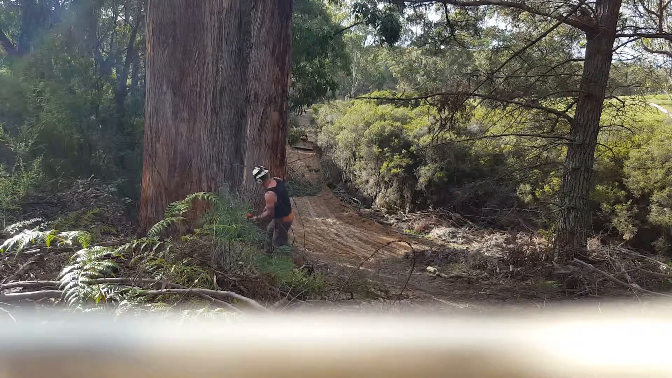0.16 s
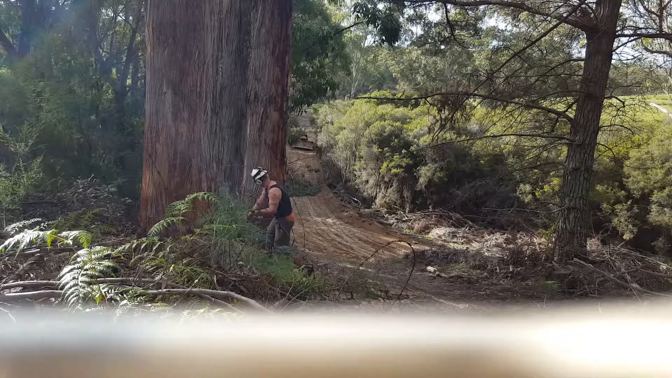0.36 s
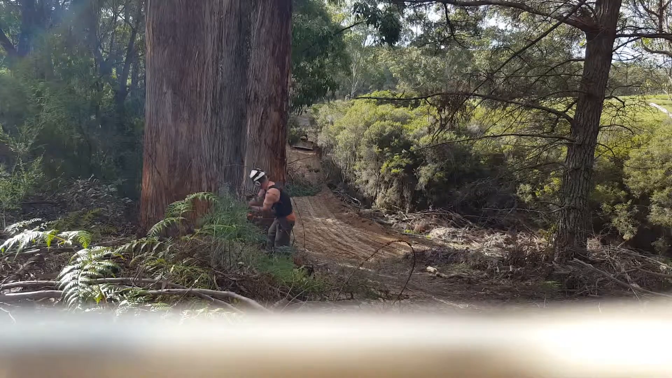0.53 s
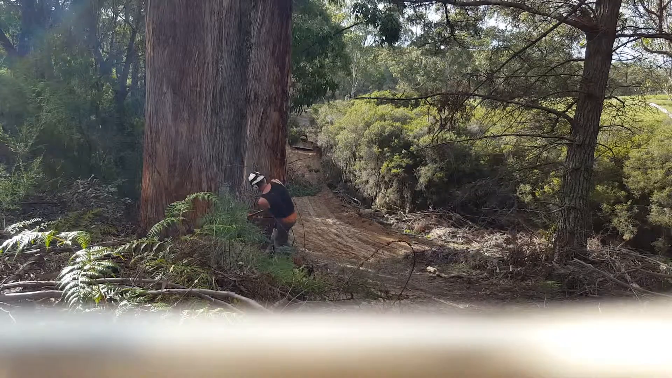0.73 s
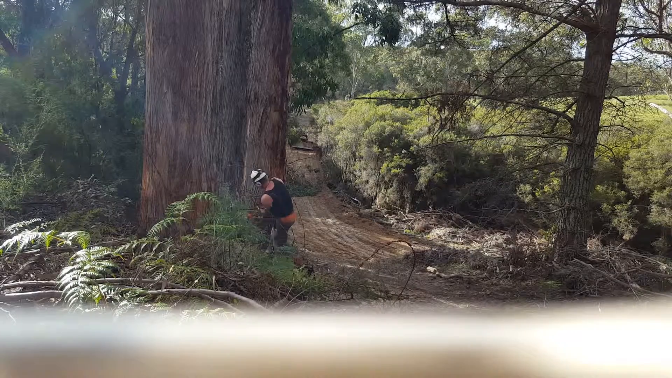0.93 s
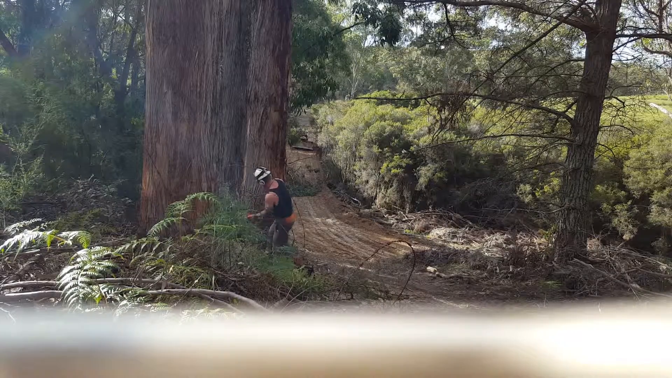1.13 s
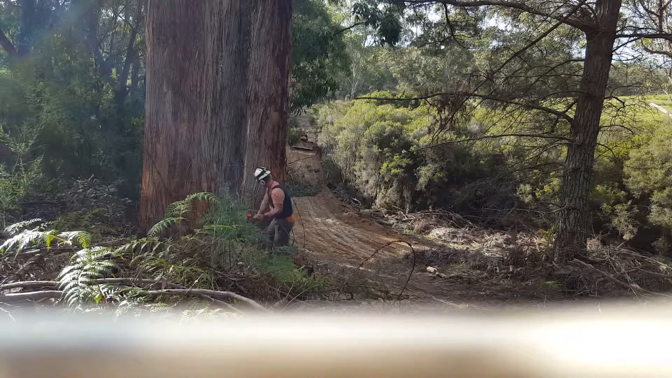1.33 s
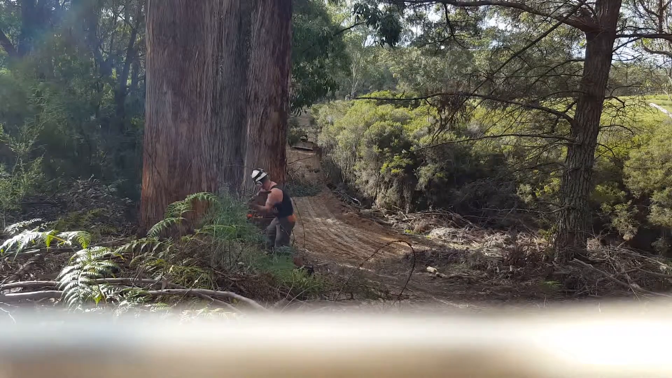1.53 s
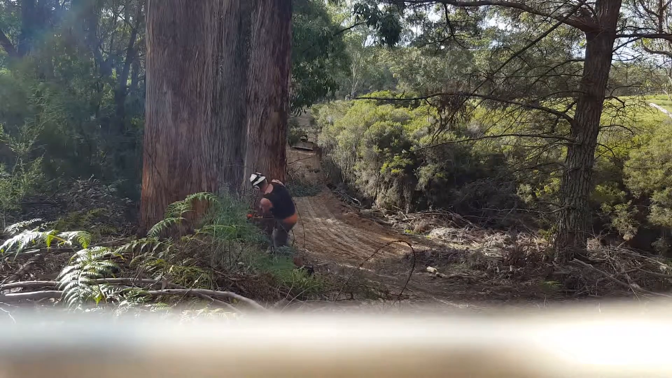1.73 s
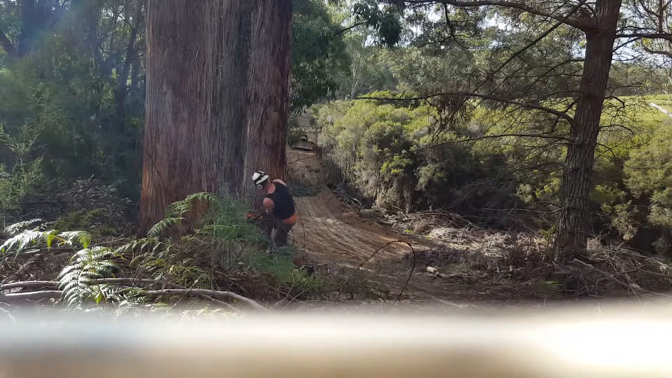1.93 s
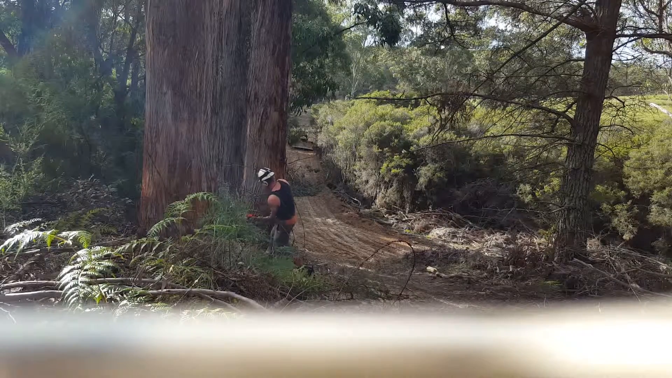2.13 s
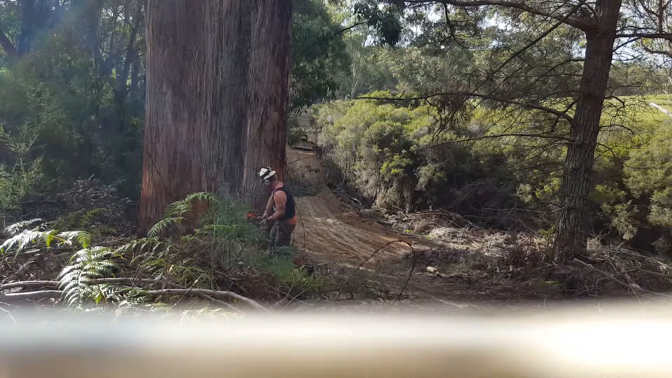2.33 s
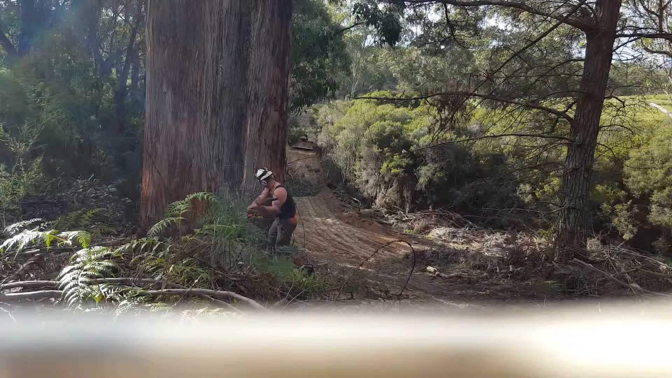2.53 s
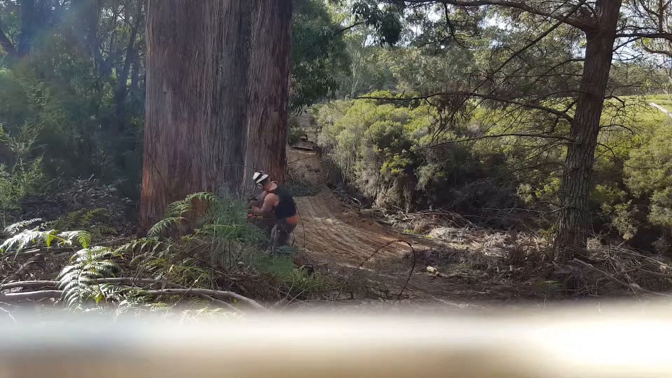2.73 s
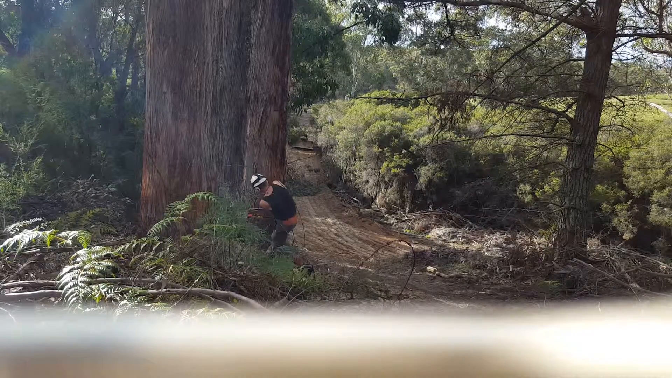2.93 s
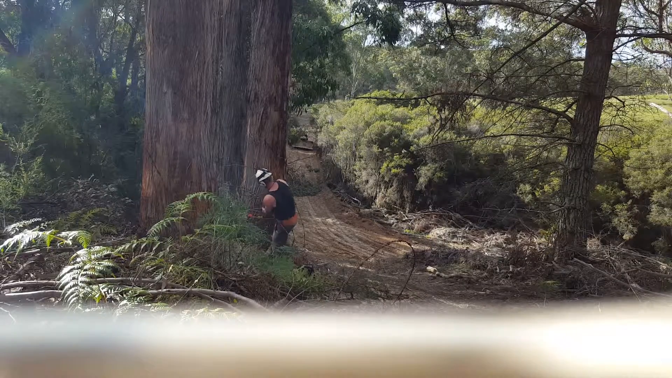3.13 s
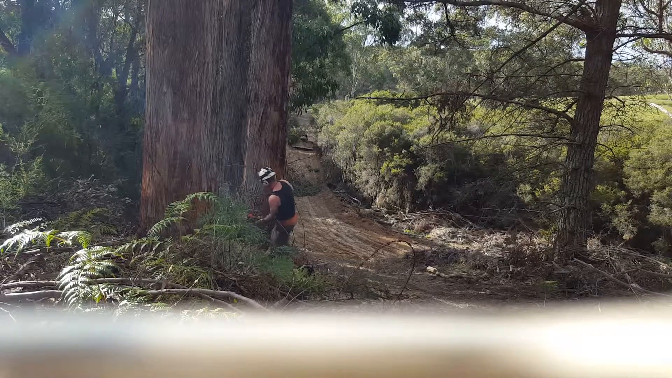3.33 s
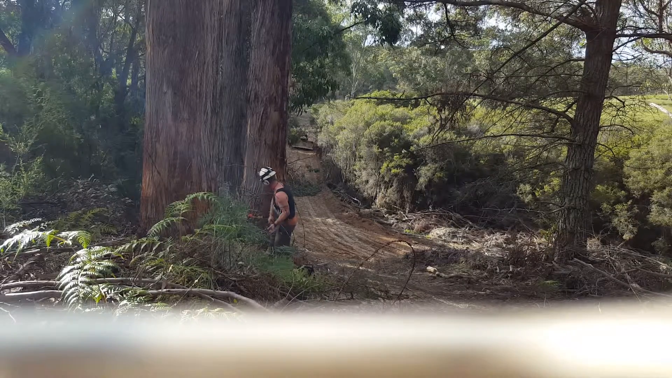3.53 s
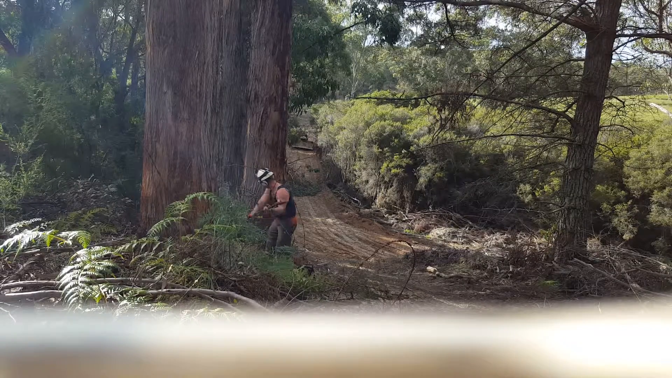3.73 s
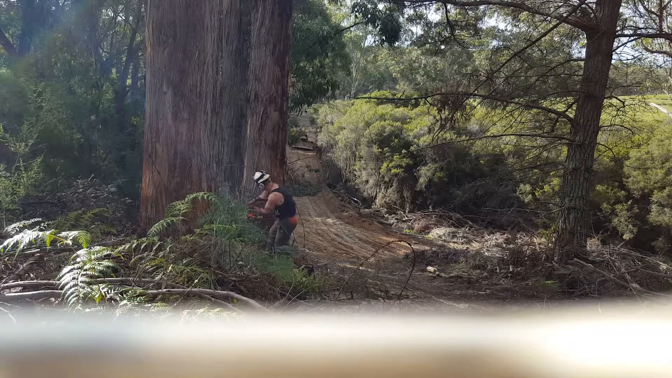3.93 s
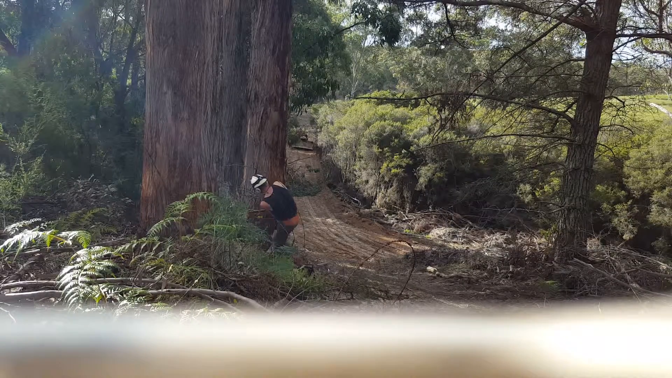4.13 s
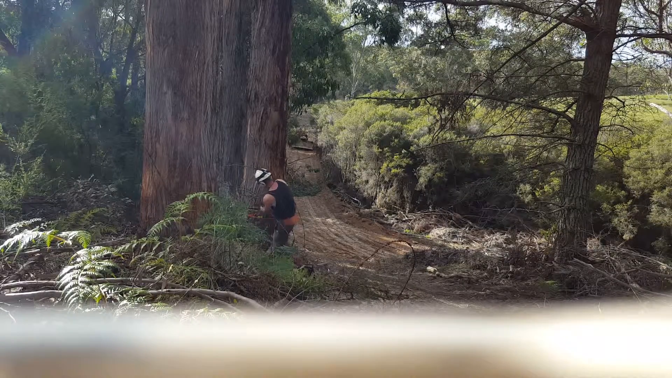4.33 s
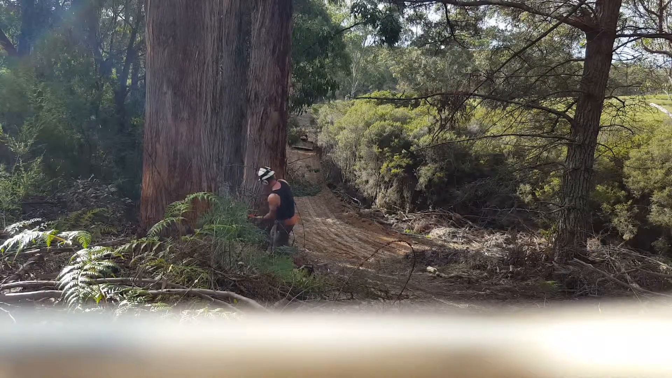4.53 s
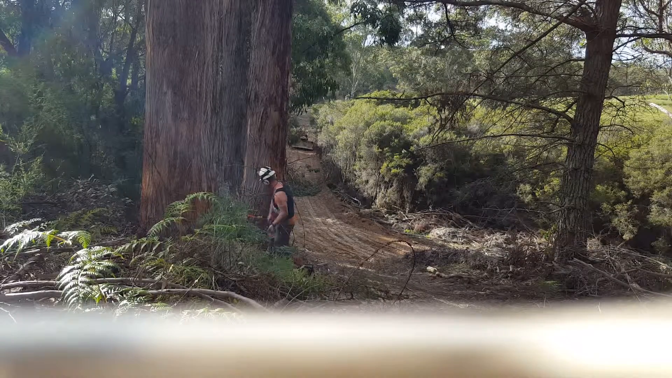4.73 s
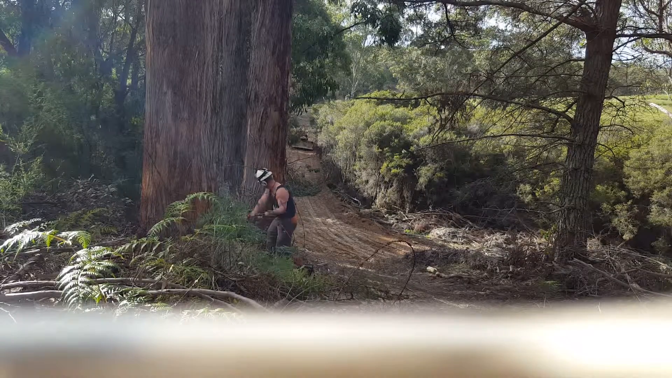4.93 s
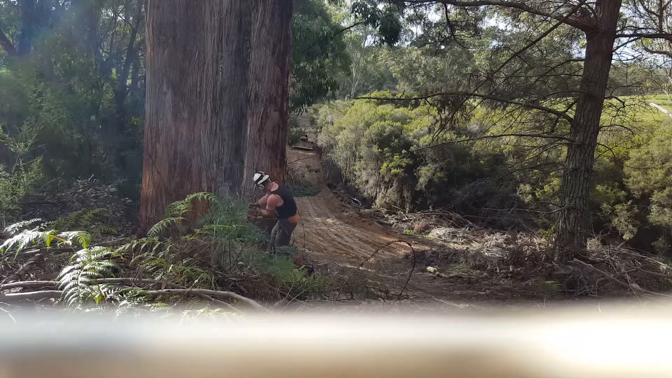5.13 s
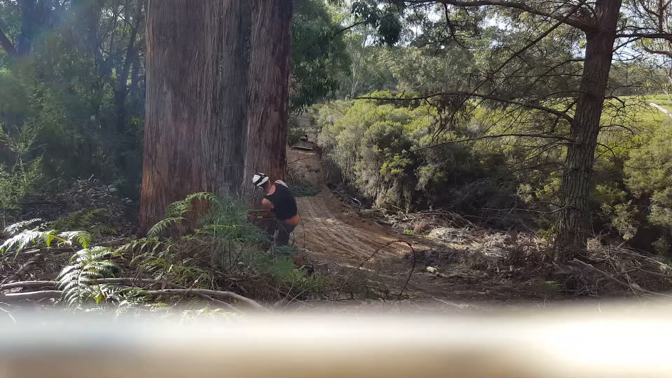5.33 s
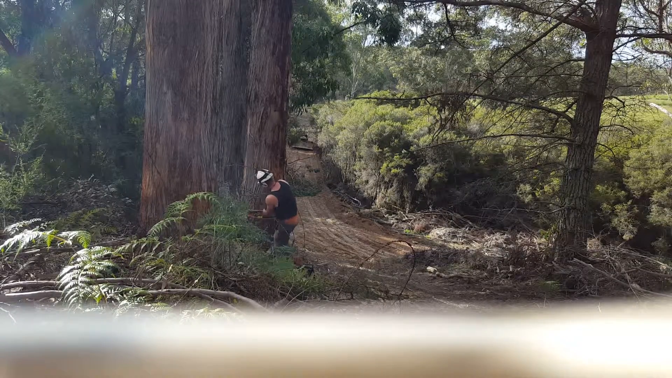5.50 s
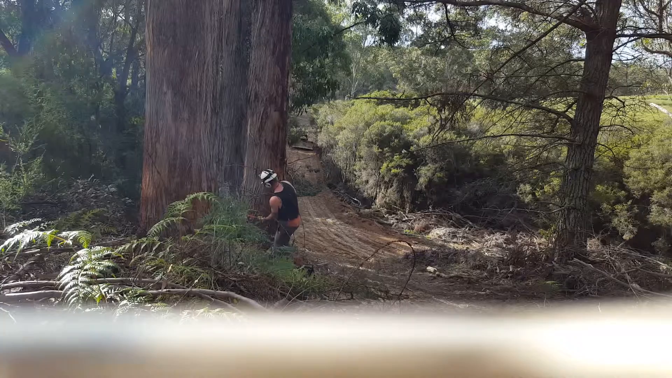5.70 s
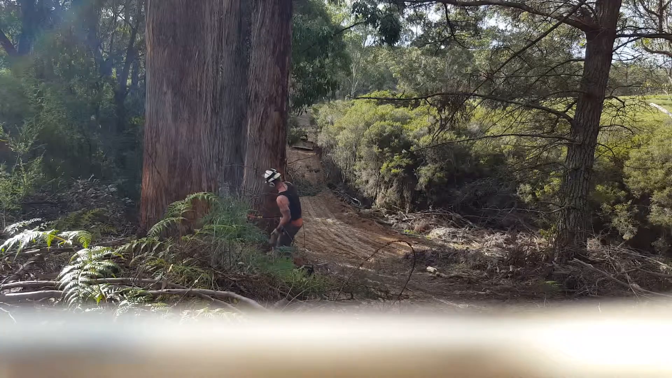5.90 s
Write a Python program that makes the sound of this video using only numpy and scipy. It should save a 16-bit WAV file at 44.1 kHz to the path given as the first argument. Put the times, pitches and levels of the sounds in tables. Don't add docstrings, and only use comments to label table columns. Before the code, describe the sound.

The tail of an earlier hammer blow fades beneath a droning engine and fan. Five blows follow, a little over a second apart, cracking on steel and thumping in wood, with patchy echoes off trunks and leaves. The third, weak one leaves the wedge rattling; the last two are loudest and make the background sag briefly. Small rustles, ticks and very faint chirps fill the gaps. Stereo microphone, open woodland.

```python
import sys
import numpy as np
from scipy import signal
from scipy.fft import rfft, irfft, next_fast_len
from scipy.io import wavfile
from scipy.ndimage import uniform_filter1d

SR = 44100
rng = np.random.default_rng(int(sys.argv[2]) if len(sys.argv) > 2 else 0)


def master(y):
    cut = np.clip(np.atleast_2d(y).T, -1, 1)
    pcm = np.round(cut * 32767)
    wavfile.write(sys.argv[1], SR, pcm.astype(np.int16))


def decibels_to_gain(level_db):
    exponent = np.asarray(level_db, float) / 20
    return 10 ** exponent


N = 267246
T = np.arange(N) / SR
SIDES = np.array([[1], [-1]])


def set_rms(x, db):
    return x * decibels_to_gain(db) / np.sqrt(np.mean(x ** 2))


def wander(rate_hz, size=N):
    hold = int(SR / rate_hz)
    steps = np.repeat(rng.standard_normal(size // hold + 1), hold)
    return 1.3 * uniform_filter1d(uniform_filter1d(steps, hold), hold)[:size]


def ring(x, hz, t60):
    pole = np.exp(2j * np.pi * hz / SR - np.log(1000) / (t60 * SR))
    return signal.lfilter([1], [1, -pole], x).imag


def read(table, hz, column=1):
    table = np.array(table)
    return np.interp(np.log(hz), np.log(table[:, 0]), table[:, column])


def bands(lo_hz, alike, size):
    octave = np.log2(np.arange(size // 2 + 1) * SR / size + 1e-9)
    white = rfft(rng.standard_normal((2, size)))
    for centre in lo_hz * 2 ** np.arange(0, np.log2(18000 / lo_hz), 1 / 3):
        a, b = np.searchsorted(octave, np.log2(centre) + np.array([-1, 1]) / 3)
        shape = np.cos(np.pi / 2 * 3 * (octave[a:b] - np.log2(centre))) ** 2
        mid, side = irfft(np.pad(white[:, a:b] * shape, ((0, 0), (a, 0))), size)
        share = np.clip(read(alike, centre), -.99, .99)
        yield centre, np.sqrt(1 + share) * mid + np.sqrt(1 - share) * side * SIDES


def add(out, s, sound):
    i = int(s * SR)
    out[:, max(i, 0):max(i + sound.shape[1], 0)] += sound[:, max(-i, 0):N - i]


# start in seconds, kind of contact, crack in dB, treble snap in dB, thump in dB.
BLOWS = [
    (-.14, "ringing", -23.5, -36, -44),
    (0.8423, "glancing", -7, -29, -19.5),
    (1.8784, "loose", 0, -7, -16.5),
    (2.9813, "seated", -5.5, -18, -14),
    (4.2180, "seated", 2.5, -15, -13),
    (5.3914, "seated", 3, -21.5, -16),
]
SCATTER = {"ringing": (-42, -38.5, 3.7), "glancing": (-45.5, -65, -2.4), "loose": (-32.5, -40.5, 1.5),
           "seated": (-31, -35, 1)}
CONTACT = {"ringing": (.018, .0015, -3.5), "glancing": (.0015, .003, 7.5), "loose": (.0098, .0026, -10.5),
           "seated": (.013, .00133, -7)}


def hammer():
    out = np.zeros((2, N))
    for s, kind, crack_db, snap_db, thump_db in BLOWS:
        bush_db, stems_db, bright_db = SCATTER[kind]
        rise_s, second_s, second_db = CONTACT[kind]
        glancing = kind == "glancing"
        grit_hz = np.linspace(4800, 14400, num=28) + rng.uniform(-150, 150, size=28)
        grit = [(hz, 420, 3.2 * rng.standard_normal() - 5.5 * np.log2(hz / 8000)) for hz in grit_hz]
        steel = decibels_to_gain(crack_db) * crack(wedge(kind, crack_db), second_s, second_db)
        sound = steel + decibels_to_gain(snap_db) * crack(grit, second_s, second_db)
        add(out, s, sound)
        add(out, s, decibels_to_gain(thump_db) * thump(glancing, rise_s, damping=.7 if glancing else 1.0))
        push = crack([(140, 42, 0), (278, 41, -7)], 0.00064, 0)
        push_db = thump_db + 12.5 - 2500 * rise_s
        add(out, s + .002, -decibels_to_gain(push_db) * push)
        dull_db = .1 * crack_db if kind == "seated" else 0
        add(out, s, decibels_to_gain(bush_db) * bush(bright_db - dull_db))
        add(out, s, decibels_to_gain(stems_db) * stems(sound))
    return out


WEDGE = {"ringing": [(1000, 420, 3), (3280, 130, -4), (5120, 80, -1.5), (6000, 87, -10), (7800, 150, -11)],
         "glancing": [(872, 98, 0.5), (1185, 116, 0.5), (1690, 76, -19), (2230, 150, -2), (2470, 240, -7.5),
         (4000, 420, -17)], "loose": [(1080, 230, -1.5), (1399, 140, 0.5), (1690, 96, -4), (2160, 150, -6),
         (2920, 120, -3.5), (3230, 150, -1), (4050, 180, -4)], "seated": [(573.5, 52, -12.5),
         (1198, 92, -2.5), (1590, 150, -14), (2180, 220, -13.5), (2674, 260, -9), (2985, 190, -21),
         (3600, 220, -24), (4200, 320, -15), (4750, 350, -18.5)]}


def wedge(kind, crack_db):
    force = crack_db if kind == "seated" else 0
    main_lo_hz, main_hi_hz = 1000, 1400
    modes = []
    for hz, width, db in WEDGE[kind]:
        if main_lo_hz < hz < main_hi_hz:
            width = width * decibels_to_gain(-0.76 * force)
        if hz < main_lo_hz:
            db = db - force
        modes.append((hz * (1 + .0023 * force), width, db))
    return modes


# frequency in Hz, left minus right in dB.
PORTS = [(500, -0.5), (1200, -3.5), (2400, 0), (4400, 1.5), (8000, 8.5), (13000, 3.5)]


def crack(modes, second_s, second_db):
    left_lead_s, attack_s = .000065, 0.00061
    late, out = T[:2048] - np.array([[0], [left_lead_s]]), 0
    for s, hit_db in ((0, 0), (second_s, second_db)):
        u = np.maximum(late - s, 0)
        for hz, width, db in modes:
            decay = (1 - np.exp(-u / attack_s)) * np.exp(-np.pi * 1.1 * width * u)
            mode = -np.sin(2 * np.pi * hz * u) * decay
            gain = decibels_to_gain(db + hit_db + read(PORTS, hz) / 2 * SIDES)
            out = out + mode * gain * width
    return out / np.abs(out).max()


# frequency in Hz, width in Hz, dB for a square blow, dB for a glancing one.
TRUNK = [(87, 8.8, -3, -9), (125, 10, -4.5, -6), (170.2, 10, -5, -7), (192.1, 7.9, -10.5, -2),
         (215.2, 11.9, -.3, -.6), (264.7, 12, -5.5, 0.5), (344.5, 17, -9, -9), (395, 18, -10, -14.5),
         (569.6, 16, -4, -5)]


def thump(glancing, rise_s, damping):
    t, out = T[:32768], 0
    for hz, width, square_db, glance_db in TRUNK:
        swell = (1 - np.exp(-t / rise_s)) ** 2 * np.exp(-np.pi * damping * width * t)
        wobble = 2 * np.pi * rng.random() + .7 * wander(40, size=len(t))
        db = glance_db if glancing else square_db
        out = out + decibels_to_gain(db) * swell * np.sin(2 * np.pi * hz * t + wobble)
    return out / np.abs(out).max() * decibels_to_gain(-.6 * SIDES)


# frequency in Hz, dB per Hz, t60 in seconds, likeness of left and right (-1 to 1).
BUSH = [(250, 0.5, 0.63, 0.99), (480, -2, .6, 0.19), (1000, -0.5, 0.82, 0), (1470, -7.5, 0.85, -0.99),
        (2470, -11, 0.69, 0), (4000, -14, 0.6, -0.58), (6000, -17, 0.46, -0.19), (8900, -26.5, 0.54, -0.25),
        (12900, -30, 0.36, 0), (15000, -29, .3, 0), (15900, -60, .2, 0)]
# delay in seconds, spread in seconds, dB over the scatter.
TRUNK_ECHOES = [
    (0.01, 0.0018, 7.5),
    (0.041, 0.0038, 7.5),
    (.077, .006, 0.5),
    (.13, 0.012, -2),
    (0.339, 0.093, 5.5),
]


def bush(bright_db):
    t, out = T[:32768], 0
    lumps_db = sum(db * np.exp(-((t - s) / spread) ** 2) for s, spread, db in TRUNK_ECHOES)
    for hz, noise in bands(200, np.array(BUSH)[:, [0, 3]], size=len(t)):
        db = read(BUSH, hz) + bright_db * np.log2(hz / 1000) - 60 * t / read(BUSH, hz, column=2)
        out = out + decibels_to_gain(db + 2.1 * wander(110, size=len(t))) * noise
    return 6 * out * (1 - np.exp(-t / .008)) * decibels_to_gain(lumps_db)


def stems(sound):
    t = T[:32768]
    hits = rng.standard_normal((2, len(t))) * decibels_to_gain(2.2 * rng.exponential(size=(2, len(t))))
    hits = hits + .6 * hits[::-1]
    hits = hits * (1 - np.exp(-t / 0.021)) * decibels_to_gain(-60 * t / 0.67)
    air = signal.butter(2, 7000, fs=SR, output="sos")
    return set_rms(signal.sosfilt(air, signal.fftconvolve(hits, sound, axes=1)), -12)


# frequency in Hz, t60 in seconds, level in dB.
SLIP_MODES = [(1810, .03, 4.5), (3060, .035, -1.5), (4520, .04, -0.5), (5300, .04, -2.5), (6450, .035, -2),
              (8100, .015, -12), (9600, .01, -11), (12800, .004, -14)]


def chatter():
    start_s, rise_s, t60_s, slip_db = 2.992, 0.0155, 0.37, -35.5
    out, t = np.zeros((2, N)), T[:16384]
    shake = rng.standard_normal((2, len(t))) * decibels_to_gain(3 * wander(93, size=len(t)))
    steel = sum(set_rms(ring(shake, hz, t60), db) for hz, t60, db in SLIP_MODES)
    swell = decibels_to_gain(slip_db - 60 * t / t60_s) * (1 - np.exp(-t / rise_s)) ** 2
    add(out, start_s, swell * steel)
    return out


ENGINE_ORDERS = np.array([6, 7, 9, 10, 11, 12, 13, 14, 18, 21, 24, 27, 30, 34, 64, 67, 70])
ENGINE_DB = [-51, -68.5, -64.5, -57.5, -65, -46.5, -52, -56, -55, -57, -59.5, -73.5, -70, -74, -66, -66.5,
             -84.5]
# frequency in Hz, dB per Hz.
DRONE = [(25, -29), (50, -23.5), (100, -13.5), (160, -17), (258, -21.5), (367, -27), (432, -17), (703, -26),
         (974, -17.5), (1350, -33.5), (1680, -28.5), (3040, -35.5), (5380, -48), (10300, -56.5),
         (16000, -53.5)]
# frequency in Hz, likeness of left and right (0 to 1).
ALIKE = [(60, 0.97), (130, 1), (290, 0.98), (640, 0.65), (1410, 0.8), (3100, 0.66), (6820, 0.56),
         (15000, 0.53)]


def vehicle():
    cycle_hz, blade_hz, fan_db = 6.72, 104.1, (-45.5, -71, -64.5)
    cycle = np.cumsum(cycle_hz * (1 + .002 * wander(1.5))) / SR
    blade = np.cumsum(blade_hz * (1 + 0.0018 * wander(1.7))) / SR
    lines = [(k * cycle, db) for k, db in zip(ENGINE_ORDERS, ENGINE_DB)]
    lines += [((k + 1) * blade, db) for k, db in enumerate(fan_db)]
    tones = 0
    for turns, db in lines:
        phase = turns + rng.random() + 0.026 * rng.standard_normal() * SIDES
        tones = tones + decibels_to_gain(db + 2.7 * wander(2.5)) * np.sin(2 * np.pi * phase)
    throb_db = np.cos(2 * np.pi * 6 * cycle) + 1.6 * np.cos(2 * np.pi * 12 * cycle + wander(9))
    swell = wander(0.45)
    clatter = 0
    for hz, noise in bands(25.33, ALIKE, size=next_fast_len(N)):
        near = np.exp(-np.log2(hz / 900) ** 2 / 3)
        db = read(DRONE, hz) - read(DRONE, 1011.0) + near * throb_db + .4 * swell + 1.1 * wander(18)
        clatter = clatter + decibels_to_gain(db) * noise[:, :N]
    return tones * decibels_to_gain(-.5 * SIDES) + clatter * decibels_to_gain(-41.5 - .4 * SIDES)


# start in seconds, peak in dB, frequency in Hz, left minus right in dB.
TICKS = [
    (.6885, -41.5, 1000, -2),
    (3.341, -38.5, 2600, -5),
    (3.956, -50, 10000, -8),
    (4.592, -57.5, 6000, -6),
    (4.985, -58, 4000, 1),
    (5.127, -53, 7000, -12),
    (5.371, -51, 3500, -9),
    (5.552, -54, 9980, 0),
]
# middle in seconds, spread in seconds, frequency in Hz, level in dB.
RUSTLES = [
    (0.271, 0.077, 1750, -51.5),
    (.31, 0.045, 2350, -54.5),
    (.28, 0.03, 3700, -64),
    (.39, 0.033, 1630, -51),
    (1.66, 0.049, 1560, -57),
    (3.01, 0.023, 4000, -37),
    (3.36, 0.068, 1800, -51),
    (3.36, 0.059, 2330, -53.5),
]
# middle in seconds, level in dB.
CHIRPS = [(.76, -79), (1.58, -73), (1.65, -80), (2.85, -80), (3.849, -71), (3.95, -68), (4.01, -75),
          (4.05, -69), (4.11, -81), (4.709, -77), (4.769, -68.5), (4.99, -73), (6.03, -71.5)]


def undergrowth():
    out, t = np.zeros((2, N)), T[:16384]
    for s, db, hz, pan_db in TICKS:
        snap = ring(rng.standard_normal(len(t)) * np.exp(-t / .0006), hz, 14 / hz)
        add(out, s, snap / np.abs(snap).max() * decibels_to_gain(db + pan_db / 2 * SIDES))
    middle = t.mean()
    for s, spread, hz, db in RUSTLES:
        grain = ring(rng.standard_normal((2, len(t))) * decibels_to_gain(2.8 * wander(60, size=len(t))), hz, 22 / hz)
        add(out, s - middle, set_rms(grain, db) * np.exp(-((t - middle) / spread) ** 2))
    for s, db in CHIRPS:
        husk = set_rms(ring(rng.standard_normal(len(t)), 5930, 0.013), db - 6.0)
        note = husk * np.exp(-((t - .02) / 0.011) ** 2)
        add(out, s - .02, note * decibels_to_gain(1.2 * SIDES))
    return out


def scene():
    dull = signal.butter(24, 15800, fs=SR, output="sos")
    span = signal.butter(2, [55, 15000], "band", fs=SR, output="sos")
    quiet = vehicle() + undergrowth() + chatter()
    return signal.sosfilt(span, hammer()) + signal.sosfilt(dull, quiet)


def roll_off(x):
    return signal.sosfilt(signal.butter(12, 16520, fs=SR, output="sos"), x)


def record(dry):
    sag_from_db, sag_db_per_db, sag_s = -2, 1.44, .45
    sag_db = 0
    for s, _, crack_db, *_ in BLOWS:
        if crack_db > sag_from_db:
            u = np.maximum(T - s, 0) / sag_s
            dip = u ** 1.66 * np.exp(2.23 * (1 - u))
            sag_db = sag_db - sag_db_per_db * (crack_db - sag_from_db) * dip
    mix = np.clip(dry * decibels_to_gain(sag_db), -.9, .9)
    return roll_off(mix)


dry = scene()
out = record(dry)
master(out)
```